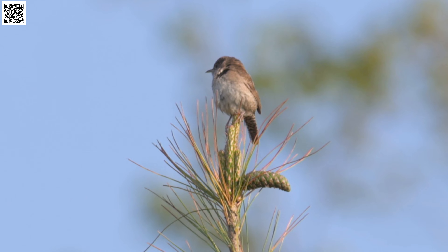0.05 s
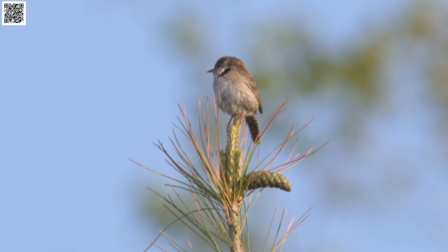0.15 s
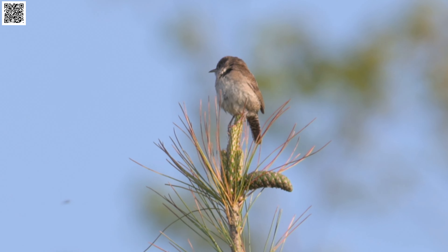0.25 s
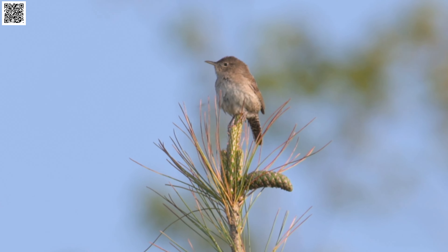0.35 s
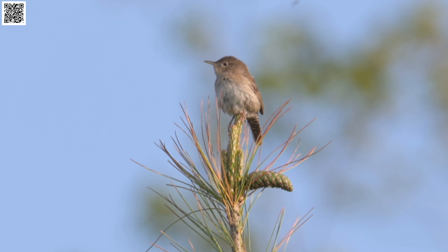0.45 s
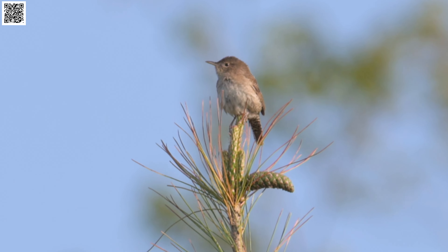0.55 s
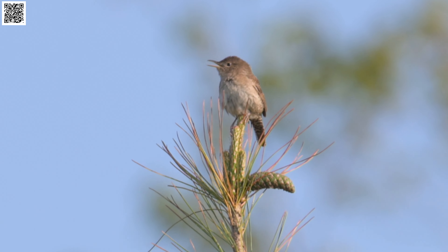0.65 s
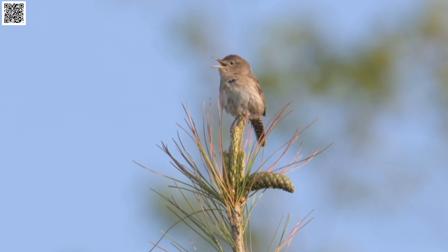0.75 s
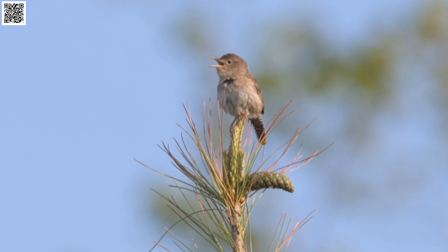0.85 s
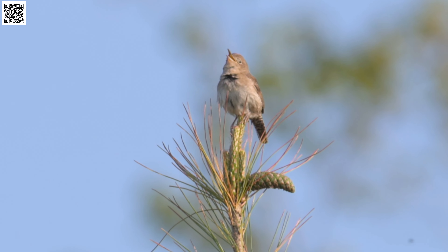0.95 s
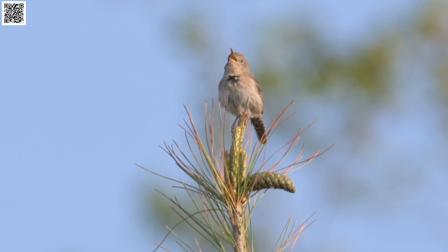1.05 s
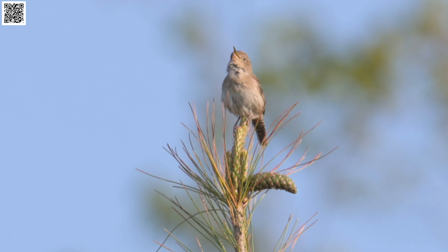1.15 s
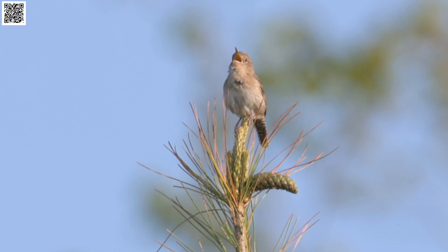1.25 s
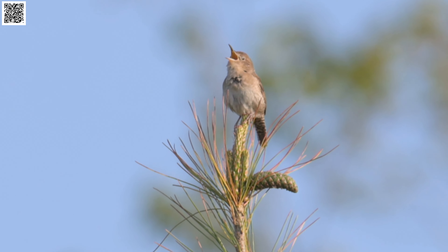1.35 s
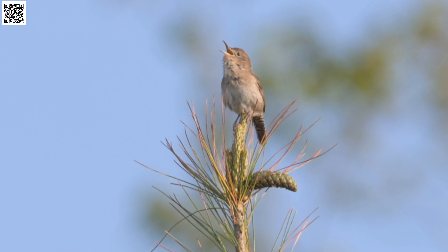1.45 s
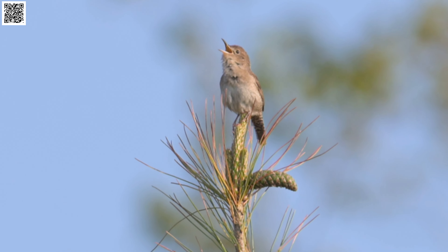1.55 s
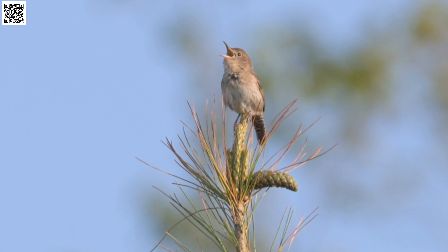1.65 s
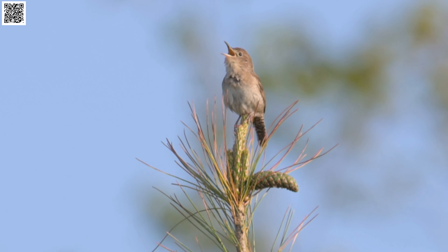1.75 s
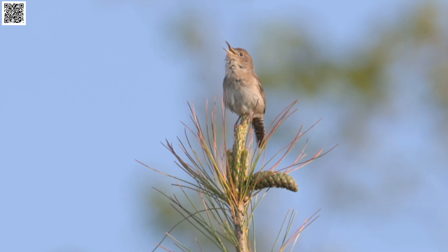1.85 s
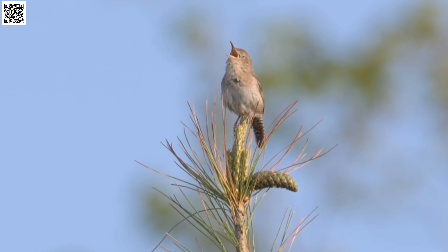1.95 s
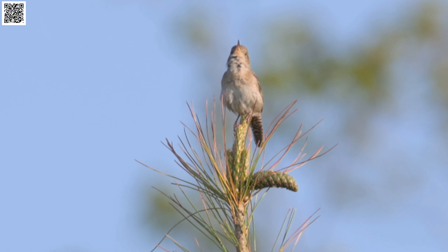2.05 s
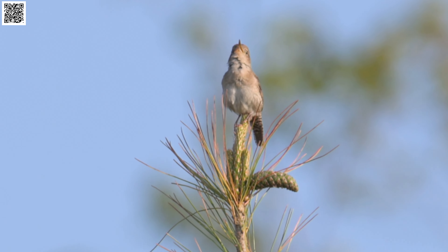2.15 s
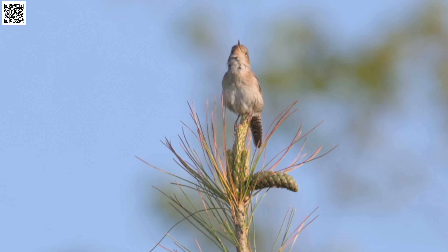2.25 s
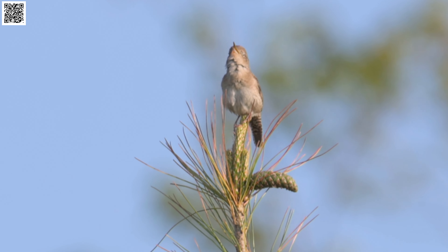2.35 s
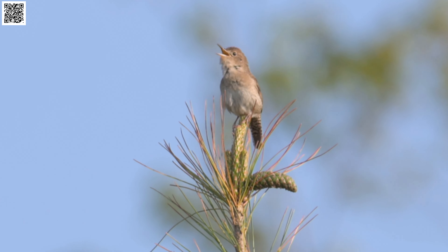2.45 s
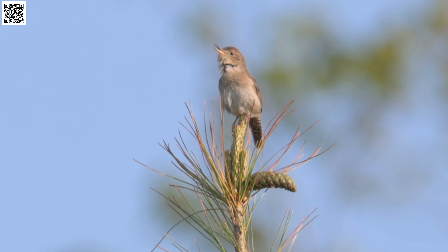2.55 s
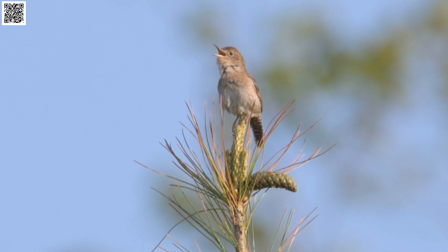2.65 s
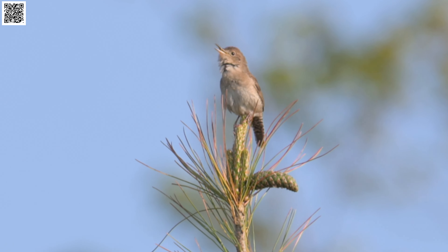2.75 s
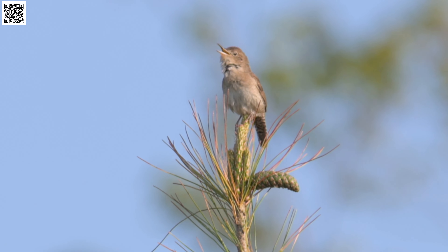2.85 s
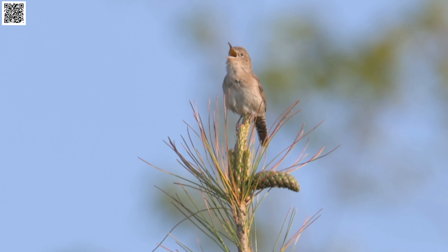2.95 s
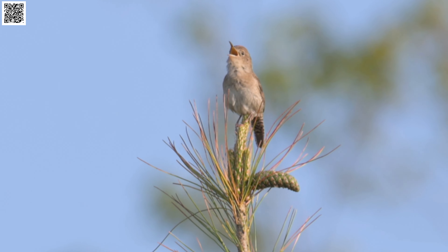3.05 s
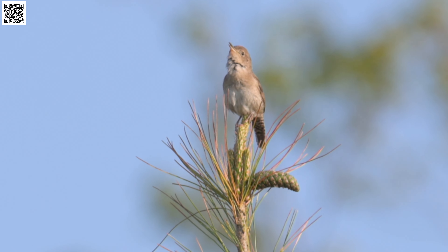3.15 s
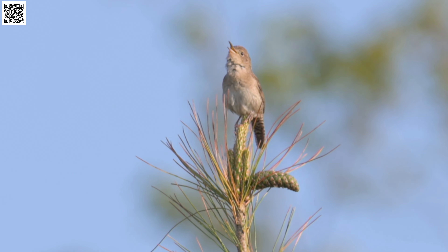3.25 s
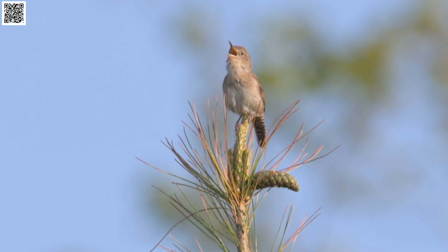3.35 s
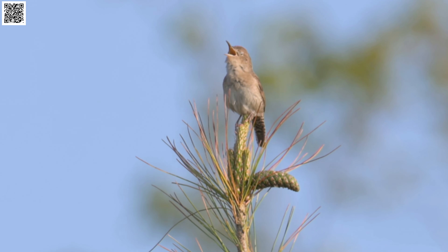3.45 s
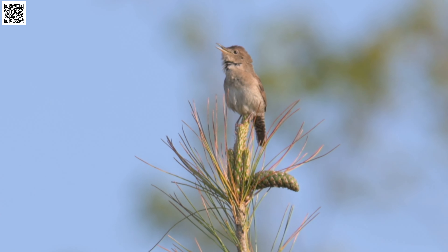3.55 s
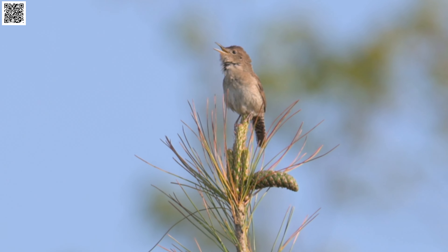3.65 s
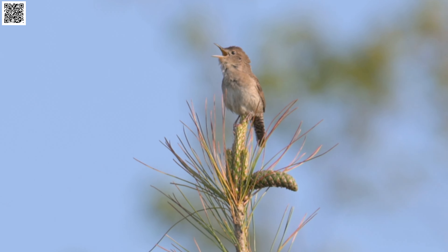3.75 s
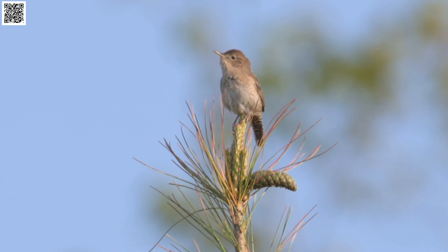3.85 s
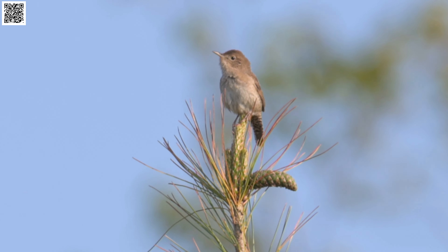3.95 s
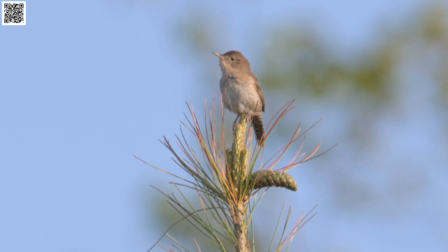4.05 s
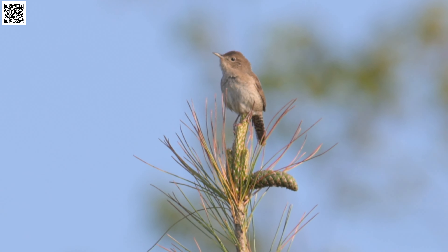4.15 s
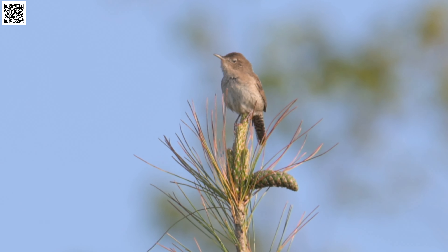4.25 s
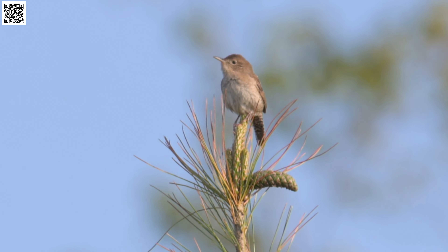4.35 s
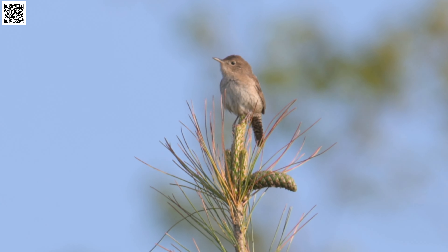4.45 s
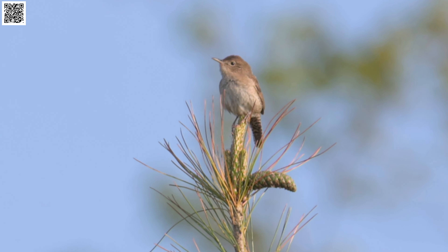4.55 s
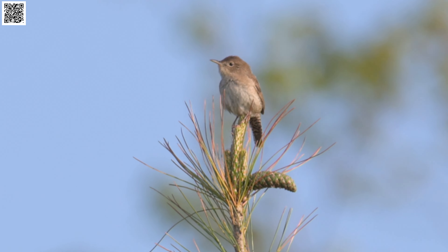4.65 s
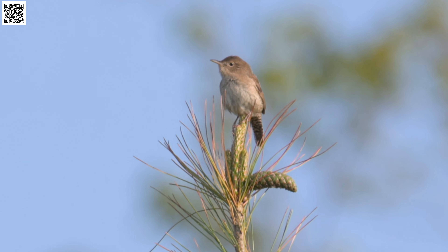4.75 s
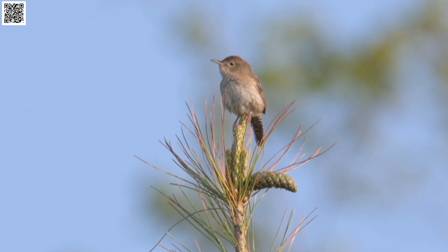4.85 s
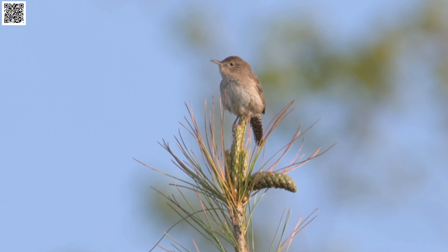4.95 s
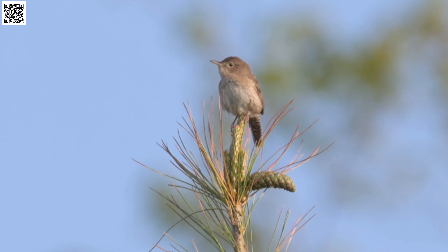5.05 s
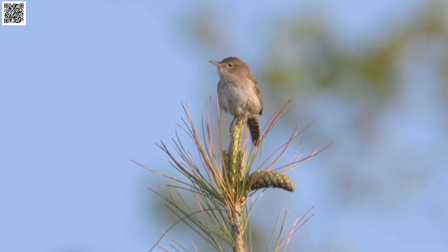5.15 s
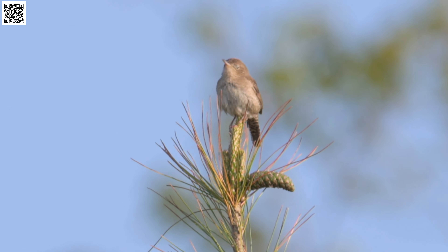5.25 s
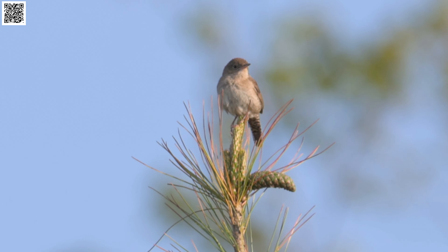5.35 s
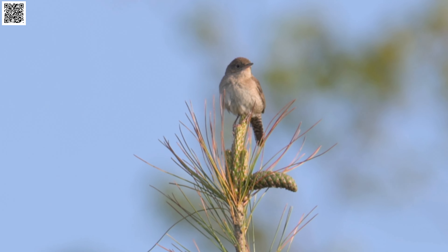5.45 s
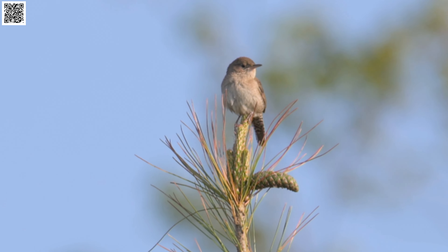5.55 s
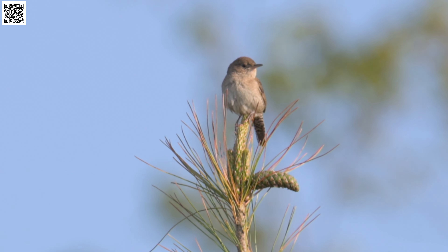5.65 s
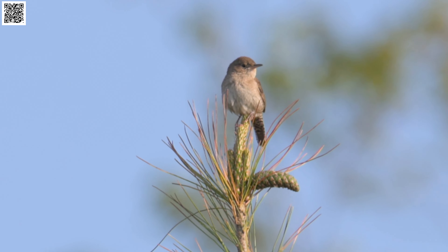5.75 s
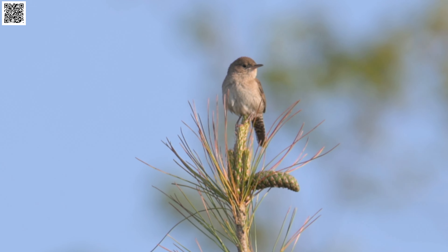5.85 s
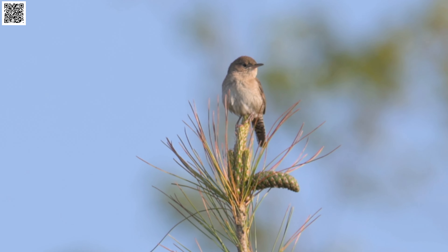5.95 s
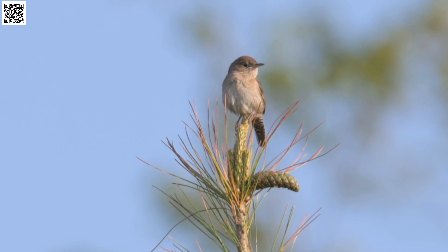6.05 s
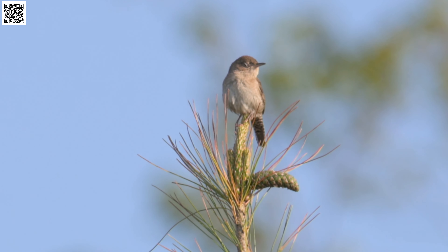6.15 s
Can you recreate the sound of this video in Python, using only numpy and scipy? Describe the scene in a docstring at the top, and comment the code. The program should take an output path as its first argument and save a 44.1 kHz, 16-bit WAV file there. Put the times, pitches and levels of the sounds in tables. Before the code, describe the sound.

A quiet outdoor bed of low air rumble, light hiss and distant traffic runs for about six seconds, with faint, echoing bird whistles in the trees. At about 0.8 seconds a nearby wren begins high, raspy chatter that grows louder. At 1.7 seconds it breaks into its full song with a falling cascade and quavering notes, followed by a very fast trill of chips from 2.1 to 2.9 seconds. A slower two-note trill follows and ends around 3.9 seconds with a short echo. The wren is the loudest sound, clear and fairly dry. Afterwards the distant birds continue with thin, sliding whistles. Soft, low microphone bumps come near 0.6, 2 and 3 seconds, with a stronger little cluster around 4.8. A few faint dry ticks fall between 4.6 seconds and the end.

```python
"""House wren on a pine top

One song: raspy chatter, a falling cascade, quavers, a fast trill and a slower two-note trill.
Each note is a gliding tone from the syrinx, turning raspy when its two sides beat unevenly.
Other birds answer from the trees, which scatter every note. Underneath lies a noise bed of air and
distant traffic, with a few soft bumps on the microphone and faint dry ticks toward the end."""
import sys
import numpy as np
from scipy import signal
from scipy.fft import rfft, irfft
from scipy.io import wavfile
from scipy.ndimage import uniform_filter1d

SR = 44100
rng = np.random.default_rng(int(sys.argv[2]) if len(sys.argv) > 2 else 0)


def master_out(mix):
    """Clip the mix to full scale and print it as 16-bit PCM to the path in sys.argv[1]."""
    frames = np.transpose(np.atleast_2d(mix))
    ceiling = np.clip(frames, -1, 1)
    pcm = np.round(ceiling * 32767).astype(np.int16)
    wavfile.write(sys.argv[1], SR, pcm)


N = 273420
TIME = np.arange(N) / SR

# Tone of the rumble and far traffic. Each row: frequency in Hz, relative level in dB.
MURMUR_SPECTRUM = [(15, -36), (25, -2), (48, -0.5), (70, -2.5), (97, 0.5), (130, -6), (238, -6), (429, -11),
                   (496, -12.5), (678, -8), (743, -8), (1260, -14), (2000, -29.5), (2600, -68),
                   (4400, -120)]
# Tone of the steady hiss. Each row: frequency in Hz, relative level in dB.
HISS_SPECTRUM = [(1200, -7.5), (2200, 0.5), (3500, -0.5), (5500, -5), (8500, -10), (11200, -5),
                 (13000, -18.5), (15500, -22)]
# Stereo width of the bed. Each row: frequency in Hz, left-right likeness (1 is mono).
BED_LIKENESS = [(60, .999), (240, 1), (480, 1), (950, 0.95), (1900, -0.039), (3800, -0.56), (7500, -0.035),
                (15000, -0.15)]
# Fader ride on the traffic. Each row: time in seconds, relative level in dB.
TRAFFIC_SWELL = [(0, -54), (1.6, -55.2), (3.6, -54), (4.18, -51.5), (5.2, -54.7), (6.2, -54.7)]
# Overtones let through by throat and beak. Each row: frequency in Hz, gain in dB.
BEAK_RESPONSE = [(5000, -34), (8500, -37), (10000, -39), (11000, -27.5), (13000, -33), (14500, -35),
                 (15700, -45), (18000, -90)]
# Single whistles in the trees. Each row: start and length in seconds, first, middle and last pitch
# in Hz, level in dB, pan in dB (positive is left).
WHISTLES = [ (.101, .055, 3550, 4370, 5600, -58.5, 6), (.231, .037, 5000, 4810, 5530, -61.5, 8),
            (.288, .037, 7000, 5800, 5000, -57.5, 7), (.337, .05, 4500, 4870, 5300, -56, 0),
            (4.374, .065, 5200, 5330, 5820, -62, 10), (4.447, .031, 6400, 7000, 6460, -63, 7),
            (4.757, .05, 2980, 2880, 3480, -59.5, -1), (4.835, .037, 3130, 2620, 2920, -57.5, -2),
            (4.924, .033, 3110, 3360, 3100, -59.5, 0), (4.952, .055, 3020, 2580, 2520, -59.5, -5),
            (5.071, .047, 4190, 4030, 3990, -58, -10), (5.68, .094, 3950, 4100, 3910, -60.5, -7),
            (5.818, .072, 6320, 4660, 3680, -57, 8), (6.038, .049, 4300, 3400, 2850, -60, -3)]
# Figures those birds repeat. Each row: as for a whistle, timed from the start of the figure.
WHISTLE_FIGURES = { "dip": [(0, .073, 5800, 4900, 6520, -49, -5), (.102, .04, 4400, 4780, 4690, -48, -4)],
                   "slide": [(0, .024, 6540, 6000, 5260, -46, 2)],
                   "high fall": [(0, .052, 8600, 8160, 8050, -55.5, 13),
                   (.055, .038, 8100, 7200, 6250, -50.5, 12)],
                   "long fall": [(0, .06, 6800, 5150, 4580, -59.5, 6)],
                   "rise": [(0, .045, 4000, 5350, 4850, -61.5, 8), (.057, .034, 4800, 6050, 6850, -64, 9)],
                   }
# Their runs. Each entry: start in seconds, count, period in seconds, then gain in dB and pitch factor
# from first repeat to last.
WHISTLE_RUNS = { "dip": dict(s=.476, count=4, period_s=.212, gain_db=[-1.2, .8], pitch=[1.01, .985]),
                "slide": dict(s=1.355, count=3, period_s=.151, gain_db=[0, -2.5], pitch=[1, .83, .79]),
                "high fall": dict(s=3.931, count=3, period_s=.1555, gain_db=[-8, 0, 1]),
                "long fall": dict(s=4.965, count=3, period_s=.151, gain_db=[-7, -6, 0]),
                "rise": dict(s=5.435, count=2, period_s=.2), }
# Bumps on the microphone. Each row: time and push width in seconds, push and shudder gains in dB.
MIC_BUMPS = [(.635, 0.0043, -29, -49), (1.964, 0.0047, -27.5, -44.5), (2.285, .002, -35, -43.5),
             (2.44, .006, -38.5, -46), (3.04, 0.0064, -30.5, -50.5), (3.25, 0.01, -35, -53),
             (4.743, 0.0052, -32, -46), (4.7905, .0013, -15, -48), (4.806, 0.0023, -30, -50),
             (4.8431, 0.0019, -16.5, -38.5)]
# Where the wren sits. Each row: pitch in Hz, pan in dB (positive is left).
WREN_PAN = [(3000, 0.2), (4400, 1.2), (6000, 3.5), (10000, 4.5)]
# Chatter figures, sung with both sides of the syrinx. Each row: delay and length in seconds,
# first, middle and last pitch in Hz, level in dB, rasp from 0 to 1.
RASP_FIGURES = { "scratch": [(0, .028, 7250, 7600, 6400, -52, .7), (0, .026, 3520, 3600, 2900, -58.5, .6),
                (.014, .015, 6400, 5550, 4700, -50, .85)],
                "zip": [(.004, .034, 8700, 7150, 5780, -39.8, .67), (0, .027, 4620, 4300, 3480, -45.8, .3),
                (.033, .025, 5540, 5630, 5150, -33.5, .26)], }
# Their runs, each growing louder. Each entry: start in seconds, count, period in seconds,
# first and last gain in dB.
RASP_RUNS = { "scratch": dict(s=.758, count=3, period_s=.074, gain_db=[-3.5, 3.5]),
             "zip": dict(s=1.291, count=3, period_s=.078, gain_db=[-1.2, 1.1]), }
# Single chatter notes. Each row: as in a chatter figure, timed from the start of the scene.
RASP_NOTES = [ (.973, .014, 5980, 4800, 4180, -41.5, .7), (.984, .027, 4350, 3980, 4100, -39.5, .85),
              (1.072, .02, 4600, 3710, 3000, -48.5, 1), (1.136, .042, 9500, 10770, 8700, -50.5, .2),
              (1.139, .044, 8500, 8470, 8050, -52, .7), (1.168, .013, 9800, 8880, 7800, -39, .63),
              (1.211, .028, 3320, 2900, 2700, -55, 1), (1.236, .034, 2330, 3440, 3490, -39.5, .3),
              (1.531, .017, 5000, 5220, 5100, -34.5, .35), (1.547, .015, 6170, 4350, 3520, -31.5, .5),
              (1.59, .04, 3190, 4700, 5480, -36, .3), (1.602, .059, 8000, 6770, 5300, -46.5, .45),
              (1.628, .023, 4460, 4420, 3430, -28, .24)]
# The wren's practised syllables. Each row: time into the syllable in seconds, pitch in Hz,
# level in dB, warble depth in Hz.
SYLLABLE_SHAPES = { "cascade": [(0, 8300, -53, 0), (.014, 9700, -52.5, 0), (.024, 9830, -42.5, 0),
                   (.036, 8800, -46.5, 550), (.059, 7160, -44, 550), (.064, 6760, -35, 400),
                   (.073, 6200, -33, 200), (.083, 6030, -34, 100), (.089, 5900, -52, 0)],
                   "quaver": [(.003, 5160, -58, 400), (.008, 5070, -36.5, 500), (.014, 5050, -32, 500),
                   (.027, 5000, -32.5, 450), (.032, 4770, -24.5, 0), (.036, 4480, -33, 0),
                   (.042, 3950, -25.5, 0), (.048, 3450, -48, 0)], "scoop": [(0, 5900, -51, 0),
                   (.005, 5530, -36, 0), (.013, 4550, -41, 0), (.019, 5820, -34.5, 0), (.027, 6600, -33, 0),
                   (.036, 7090, -37, 0), (.041, 7200, -50, 0)], "slur": [(0, 4580, -56, 0),
                   (.004, 4050, -33.5, 0), (.011, 3510, -26, 0), (.017, 3180, -29.5, 0),
                   (.023, 2850, -34, 0), (.026, 2730, -52, 0)], "chip": [(0, 5080, -52, 0),
                   (.004, 4240, -36, 0), (.008, 3680, -27, 0), (.011, 3464, -25.5, 0), (.016, 3086, -30, 0),
                   (.02, 2850, -30.5, 0), (.024, 2610, -41.5, 0), (.027, 2500, -63, 0)],
                   "upsweep": [(0, 3970, -44, 0), (.004, 3950, -35, 0), (.013, 3700, -29.5, 0),
                   (.017, 3300, -50.5, 0), (.0242, 4330, -27, 0), (.034, 4600, -24.5, 0),
                   (.037, 5060, -31.5, 0), (.04, 5600, -35, 0), (.043, 5880, -43, 0)],
                   "warble": [(0, 2890, -52, 0), (.006, 3030, -38, 50), (.011, 3200, -32.5, 310),
                   (.02, 3415, -31, 375), (.027, 3454, -34, 440), (.031, 3100, -28, 0),
                   (.037, 2600, -34, 0), (.041, 2230, -42.5, 0), (.045, 1930, -63, 0)], }
# The song; quavers interleave with scoops, upsweeps with warbles. Each entry: start in seconds, count,
# period and its growth per repeat in seconds, then gain in dB and pitch factor from first to last.
SONG_RUNS = { "cascade": dict(s=1.678, count=1),
             "quaver": dict(s=1.7837, count=3, period_s=.126, gain_db=[.1, 2, 1.7], pitch=[.98]),
             "scoop": dict(s=1.851, count=2, period_s=.128, gain_db=[3.5], pitch=[1.004, .99]),
             "slur": dict(s=2.1, count=3, period_s=.0405, gain_db=[-2.4, -.6], pitch=[1.018, .992]),
             "chip": dict(s=2.222, count=16, period_s=.0406, slowing_s=.00007, gain_db=[.4, 0, -.4, .4],
             pitch=[.992, .977, .978, 1.001]),
             "upsweep": dict(s=2.8788, count=8, period_s=.1297, slowing_s=.00096, gain_db=[1.6, 2, 1.8, -1],
             pitch=[1.022, .952, .944, .92]),
             "warble": dict(s=2.945, count=7, period_s=.1306, slowing_s=.0007, gain_db=[.1, -1.5, -1.7],
             pitch=[1.03, .95, .968]), }
# Faint ticks nearby. Each row: time and width in seconds, level in dB.
DRY_TICKS = [(4.597, 0.004, -51), (5.727, .005, -51.5), (5.812, .005, -51), (6.179, .0015, -56)]


def from_db(db):
    """Decibels to gain."""
    return 10 ** (np.asarray(db) / 20)


def rms_one(x):
    """Scale to unit power."""
    return x / np.sqrt(np.mean(x ** 2) + 1e-20)


def at_hz(points, hz):
    """Read a table on a log-frequency axis."""
    knots, values = np.transpose(points)
    return np.interp(np.log(np.maximum(hz, 1)), np.log(knots), values)


def slow_noise(count, hz):
    """Random modulation at unit power, rolled off above hz."""
    sos = signal.butter(2, hz, fs=SR, output="sos")
    return rms_one(signal.sosfilt(sos, rng.standard_normal(count + 4096))[4096:])


def air_and_traffic(murmur_db=-49, hiss_db=-64, gust_db=1.5, gust_hz=4, crossover_hz=170):
    """The bed: gusty rumble, swelling far traffic and steady hiss, centred in the bass, wide on top."""
    hz = np.arange(N // 2 + 1) * SR / N
    mid, side = rfft(rng.standard_normal((2, N)))
    alike = np.clip(at_hz(BED_LIKENESS, hz), -.8, 1)
    field = mid + np.sqrt((1 - alike) / (1 + alike)) * side * [[1], [-1]]
    colour = from_db(at_hz(MURMUR_SPECTRUM, hz)) * hz / np.hypot(hz, 20) / (1 + (hz / 1900) ** 8)
    murmur = field * rms_one(colour) * from_db(murmur_db)
    lows = 1 / (1 + (hz / crossover_hz) ** 4)
    swell_db = np.interp(TIME, *np.transpose(TRAFFIC_SWELL))
    rumble = irfft(murmur * lows, N) * from_db(gust_db * slow_noise(N, gust_hz))
    traffic = irfft(murmur * (1 - lows), N) * from_db(swell_db - np.median(swell_db))
    hiss = from_db(hiss_db) * irfft(field * rms_one(from_db(at_hz(HISS_SPECTRUM, hz))), N)
    return rumble + traffic + hiss


def add(out, s, sound):
    """Mix a sound in from s seconds."""
    i = max(round(s * SR), 0)
    out[..., i:i + sound.shape[-1]] += sound[..., :N - i]


def panned(sound, pan_db):
    """Place a sound by its left-right level difference."""
    return np.array([sound * from_db(pan_db / 2), sound * from_db(-pan_db / 2)])


def repeats(s, count, period_s=0, slowing_s=0, gain_db=(0,), pitch=(1,)):
    """Start, gain and pitch factor of each repeat; the pace can slow while force and pitch drift."""
    k = np.arange(count)
    starts = s + period_s * k + slowing_s * k * (k - 1) / 2
    drifts = [np.interp(k, np.linspace(0, count - 1, len(path)), path) for path in (gain_db, pitch)]
    return zip(starts, *drifts)


def sequence(figures, runs):
    """Lay out every figure along its run, as rows of single notes."""
    return [(s + delay, length, factor * first, factor * middle, factor * last, db + gain_db, pan_or_rasp)
            for name, run in runs.items() for s, gain_db, factor in repeats(**run)
            for delay, length, first, middle, last, db, pan_or_rasp in figures[name]]


def glide(length, pitches, taper):
    """Pitch arcs through three points while the air pressure swells and falls."""
    progress = np.linspace(0, 1, int(length * SR))
    hz = np.polyval(np.polyfit([0, .5, 1], pitches, 2), progress)
    return hz, np.abs(np.sin(np.pi * progress)) ** taper


def syrinx(hz, rasp, jitter=.0076, rasp_jitter=.035, buzz_hz=720, lowest_hz=2600):
    """A nearly pure tone; in rasp the two sides beat unevenly, adding sidebands and half-pitch lines."""
    count = len(hz)
    wobble = (jitter + rasp_jitter * rasp ** 2) * slow_noise(count, 1800)
    phase = 2 * np.pi * np.cumsum(hz * (1 + wobble)) / SR
    second = .5 * from_db(at_hz(BEAK_RESPONSE, 2 * hz)) * np.sin(2 * phase)
    third = from_db(at_hz(BEAK_RESPONSE, 3 * hz)) * np.sin(3 * phase)
    radiated = 1 / (1 + (2 * lowest_hz / hz) ** 8)  # the sub-octave fades below lowest_hz
    halves = radiated * from_db(-7) * np.sin(phase / 2) + from_db(-15) * np.sin(1.5 * phase)
    buzz = .85 * np.sin(2 * np.pi * buzz_hz * np.arange(count) / SR)
    scratch = .54 * slow_noise(count, 1350)
    return (1 + rasp * (buzz + scratch)) * (np.sin(phase) + second + third + rasp * halves)


def far_chorus(count=110, low_hz=2700, high_hz=6500):
    """The farthest birds merge into a faint random twitter."""
    out = np.zeros((2, N))
    for when, size, register, onset, ending, force, side in rng.random((count, 7)):
        centre = low_hz * (high_hz / low_hz) ** register
        pitches = centre * np.array([.85 + .35 * onset, 1, .85 + .292 * ending])
        hz, swell = glide(.04 + .045 * size, pitches, taper=.57)
        note = from_db(-75.75 + 9 * force) * swell * syrinx(hz, rasp=.13)
        add(out, when * (N - 1) / SR, panned(note, pan_db=12 * (side - .5)))
    return out


def neighbours(flutter_db=1.5, waver=.0068):
    """Whistles from other birds flutter on their way through the branches."""
    out = np.zeros((2, N))
    for s, length, *pitches, db, pan_db in WHISTLES + sequence(WHISTLE_FIGURES, WHISTLE_RUNS):
        hz, swell = glide(length, pitches, taper=.28)
        hz = hz * (1 + waver * slow_noise(len(hz), 153))
        gain = from_db(db + flutter_db * slow_noise(len(hz), 81))
        add(out, s, panned(gain * swell * syrinx(hz, rasp=0), pan_db))
    return out


def trees(birds, near_db, near_t60, far_db, far_t60):
    """Needles and twigs close by scatter a quick haze, the wood behind a longer tail."""
    t = TIME[:SR]
    haze = 0
    for db, t60 in (near_db, near_t60), (far_db, far_t60):
        echoes = rng.standard_normal((2, SR)) * from_db(-60 * t / t60) * (t > .002)
        haze = haze + from_db(db) * rms_one(echoes) / np.sqrt(SR)
    return birds + signal.fftconvolve(birds, haze, axes=1)[:, :N]


def bell_curve(offset, width):
    """A smooth rise and fall, peaking at zero offset."""
    return np.exp(-(offset / width) ** 2)


def mic_bumps(rolloff_hz=32, shudder_hz=130, shudder_s=.028):
    """Each soft push is thinned by the microphone's bass roll-off, and the mount shudders around it."""
    push = sum(from_db(db) * bell_curve(TIME - s, width) for s, width, db, _ in MIC_BUMPS)
    shudder = sum(from_db(db) * bell_curve(TIME - s, shudder_s) for s, _, _, db in MIC_BUMPS)
    thump = signal.sosfilt(signal.butter(2, rolloff_hz, "high", fs=SR, output="sos"), push + 1e-18)
    return thump + shudder * slow_noise(N, shudder_hz)


def wren_chatter():
    """The opening: short, raspy glides with the two sides of the syrinx beating."""
    out = np.zeros((2, N))
    for s, length, *pitches, db, rasp in RASP_NOTES + sequence(RASP_FIGURES, RASP_RUNS):
        hz, swell = glide(length, pitches, taper=.84)
        add(out, s, panned(from_db(db) * swell * syrinx(hz, rasp), at_hz(WREN_PAN, hz)))
    return out


def fizz(hz, db=-34.5, strongest_at_hz=5200):
    """A trace of bright turbulence rides on the high, tense notes."""
    band = signal.butter(2, [10200, 11700], "band", fs=SR, output="sos")
    noise = rms_one(signal.sosfilt(band, rng.standard_normal(len(hz))))
    return from_db(db) * noise * bell_curve(np.log(hz / strongest_at_hz), 1 / 6)


def syllable(name, gain_db, factor, warble_hz=148.4):
    """One learnt syllable, with small chance changes of pitch and force."""
    knots, *columns = np.transpose(SYLLABLE_SHAPES[name])
    t = np.arange(int(knots.max() * SR)) / SR
    hz, db, depth = [uniform_filter1d(np.interp(t, np.sort(knots), c), size=64) for c in columns]
    warble = depth * np.cos(2 * np.pi * warble_hz * t)
    hz = factor * (hz + warble) * (1 + .013 * slow_noise(len(t), 57))
    pressure = from_db(db + gain_db + .75 * slow_noise(len(t), 180)) * signal.windows.tukey(len(t), .08)
    return panned(pressure * (syrinx(hz, rasp=0) + fizz(hz)), at_hz(WREN_PAN, hz))


def wren_song(slack_at_s=(2.385, 2.672), slack_width_s=.02, slack_db=-2.2, slack_flat=.03):
    """Runs of syllables; twice the fast trill slackens and a chip comes out softer and flatter."""
    out = np.zeros((2, N))
    for name, run in SONG_RUNS.items():
        for s, gain_db, factor in repeats(**run):
            slack = sum(bell_curve(s - at, slack_width_s) for at in slack_at_s)
            add(out, s, syllable(name, gain_db + slack_db * slack, factor * (1 - slack_flat * slack)))
    return out


def ticks(band_hz=(4000, 11200), ring_hz=11000, ring_gain=3.1):
    """Short scratches of bright noise with a high resonance."""
    envelope = sum(from_db(db) * bell_curve(TIME - s, width) for s, width, db in DRY_TICKS)
    band = signal.butter(4, band_hz, "band", fs=SR, output="sos")
    noise = signal.sosfilt(band, rng.standard_normal((2, N)))
    ring = signal.lfilter(*signal.iirpeak(ring_hz, Q=6, fs=SR), noise)
    return envelope * rms_one(noise + ring_gain * ring)


def scene():
    """The wren is up front and fairly dry; the other birds sit back, wrapped in echo."""
    wren = trees(wren_chatter() + wren_song(), near_db=-9, near_t60=.065, far_db=-16, far_t60=.74)
    others = trees(neighbours() + far_chorus(), near_db=-5.5, near_t60=.19, far_db=-4.5, far_t60=.7)
    return wren + others + mic_bumps() + ticks() + air_and_traffic()


def record(dry, cutoff_hz=15700):
    """A steep high cut on the whole mix."""
    return signal.sosfilt(signal.ellip(12, .1, 80, cutoff_hz, fs=SR, output="sos"), dry)


dry = scene()
out = record(dry)
master_out(out)
```